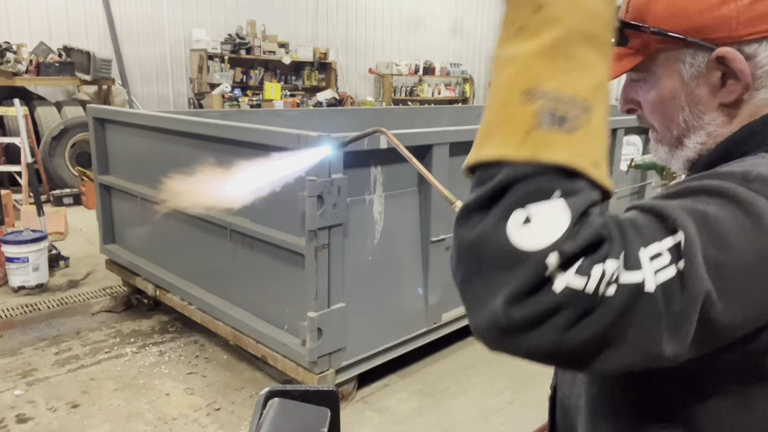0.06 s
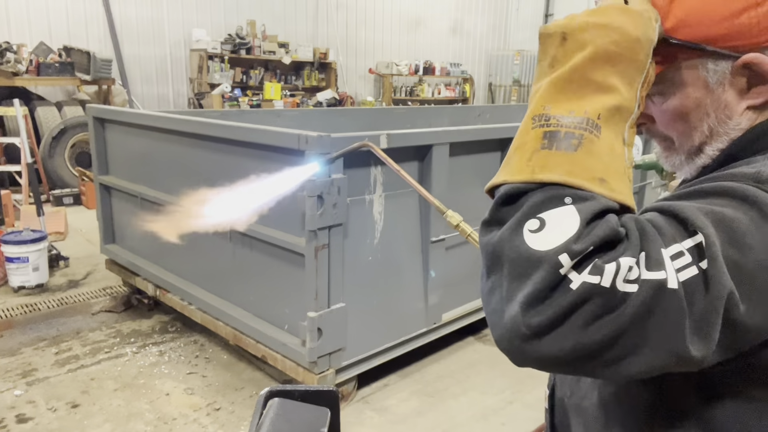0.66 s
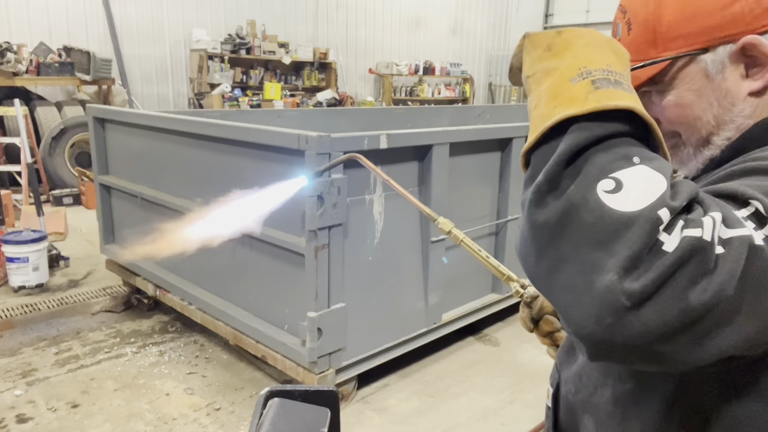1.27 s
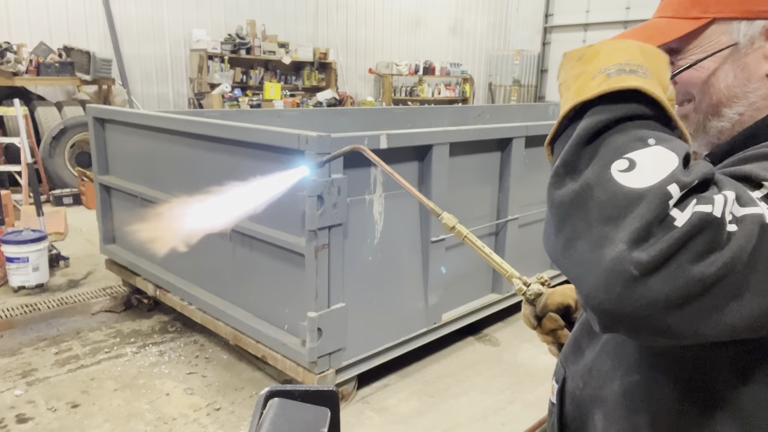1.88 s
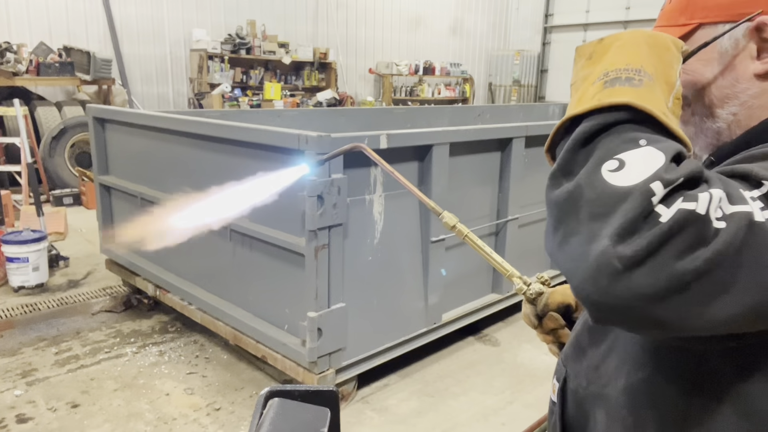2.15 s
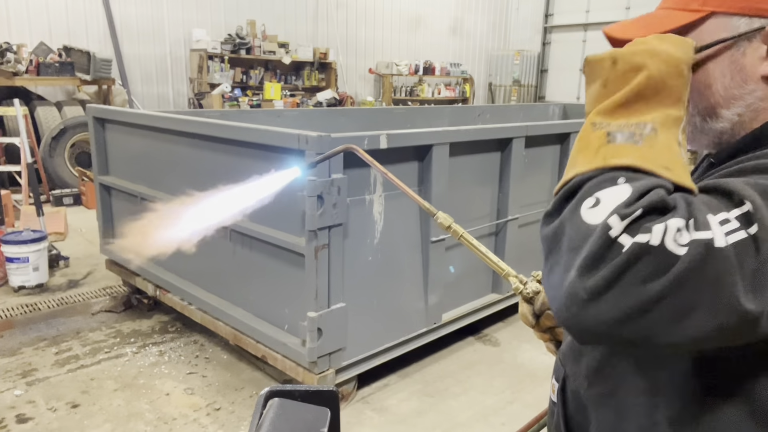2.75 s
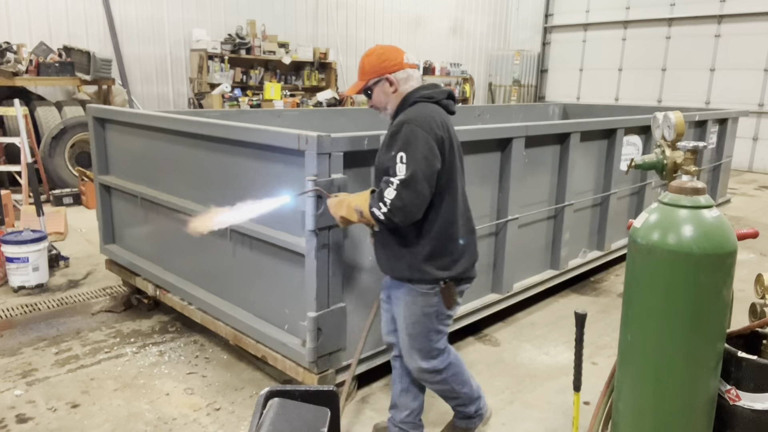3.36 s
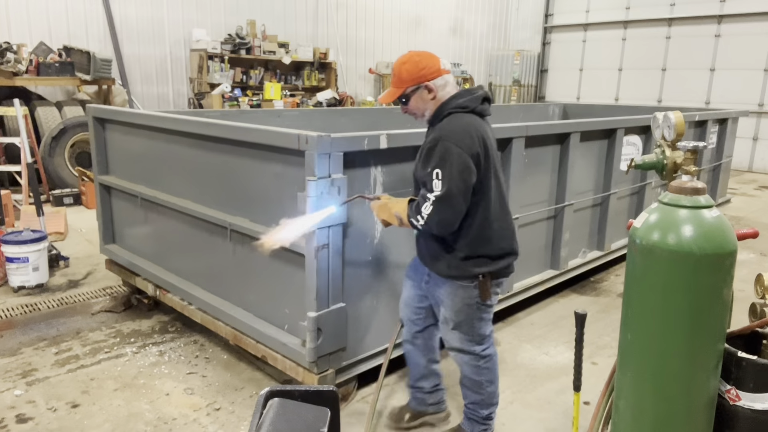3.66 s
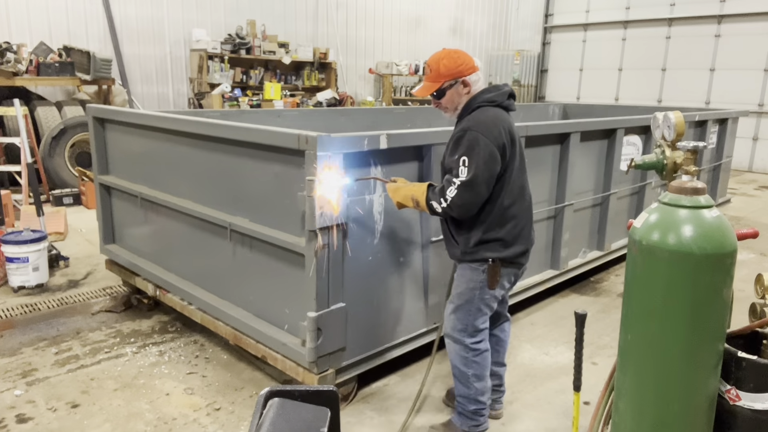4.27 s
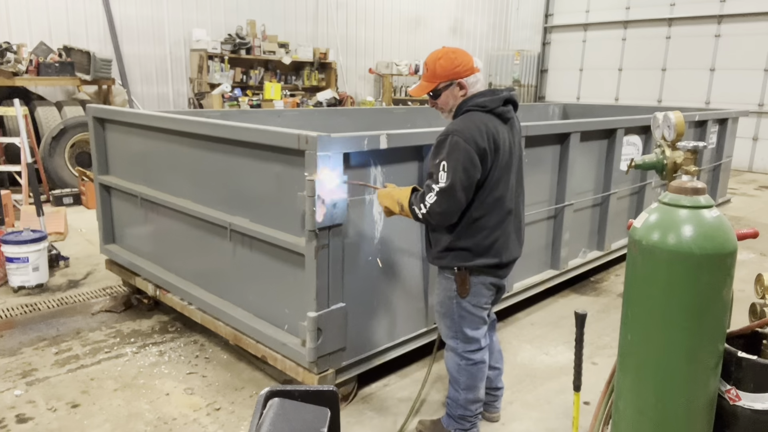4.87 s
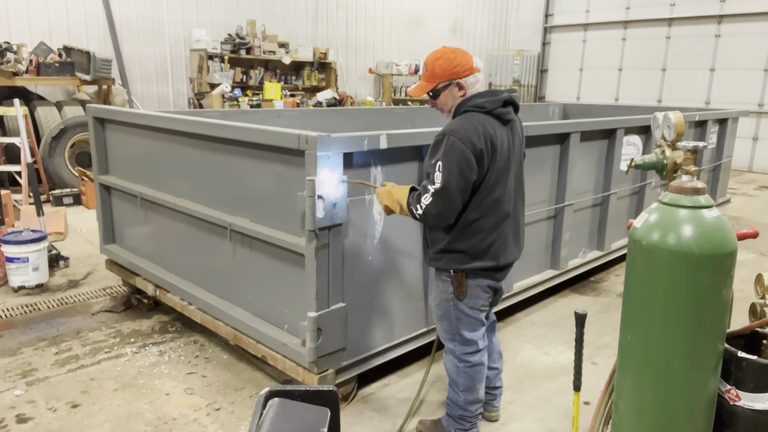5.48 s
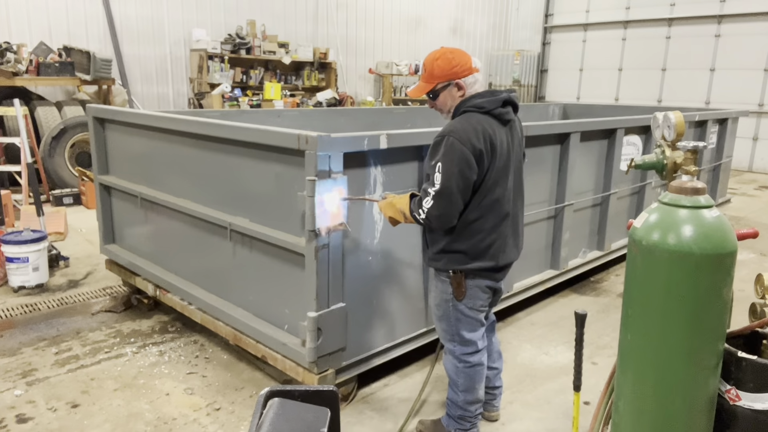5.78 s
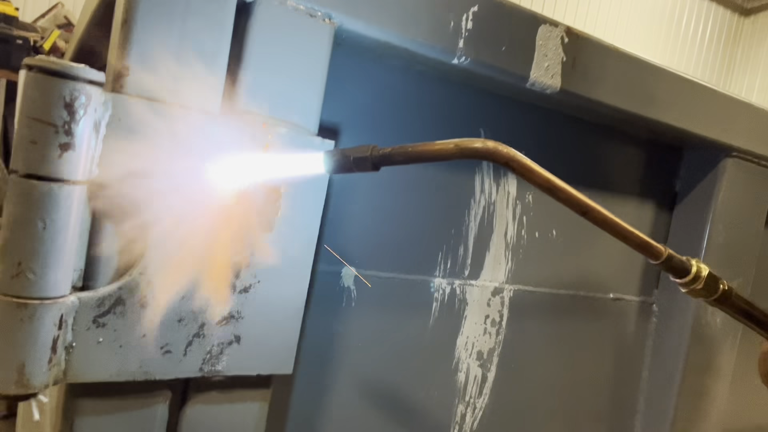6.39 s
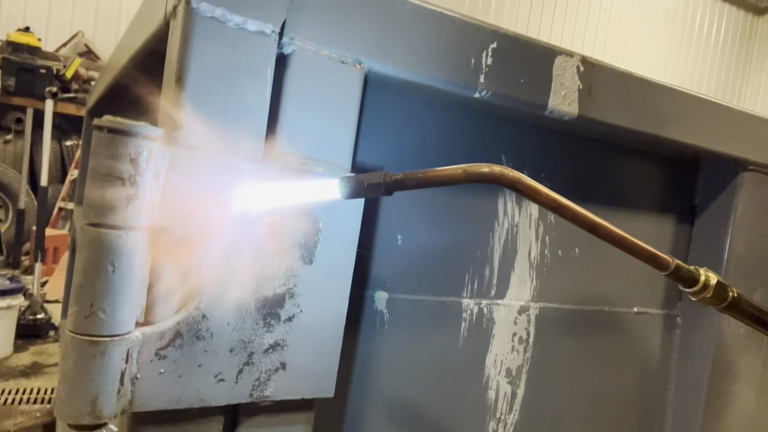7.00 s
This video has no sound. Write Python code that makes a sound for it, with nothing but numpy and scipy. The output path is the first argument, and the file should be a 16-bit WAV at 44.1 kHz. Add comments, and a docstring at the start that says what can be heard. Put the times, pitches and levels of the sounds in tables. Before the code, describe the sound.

A gas torch burns with a steady rushing roar and hiss in a workshop, then flutters and spits against a steel hinge.

```python
"""An oxy-acetylene torch burns over dull workshop room tone, heard first from beside the welder:
the turbulent flame roars and the gas jet hisses. At 3.1 s we cut to across the floor. From 4 s the
flame plays on a steel hinge: the roar swells, then softens, gas splashes and spits off the plate, and
the hiss flares whenever the jet catches an edge. At 5.9 s we cut right to the nozzle, where the hiss
keeps swishing with its echo off the steel as the nozzle moves."""
import sys
import numpy as np
from scipy import signal
from scipy.io import wavfile
from scipy.ndimage import uniform_filter1d

SR = 44100
rng = np.random.default_rng(int(sys.argv[2]) if len(sys.argv) > 2 else 0)


def generate_wav(sig):
    """Save sig (samples, or channels by samples) to the path in sys.argv[1] as 16-bit PCM at SR."""
    pcm = np.round(np.clip(np.atleast_2d(sig).T, -1, 1) * 32767).astype(np.int16)
    wavfile.write(sys.argv[1], SR, pcm)


N = 310464

BESIDE, FAR, CLOSE = range(3)  # listening places, in order
CUTS_S = (3.145, 5.941)
TOUCH_S, TOUCH_LENGTH_S = 3.96, 0.24  # the flame's tip reaches the steel

# room tone of the shop (frequency [Hz], level [dB])
ROOM_TONE = [(30, -89), (65, -69), (110, -73), (170, -89), (280, -65.5), (600, -74.5), (1500, -73.5),
             (4000, -81)]
# a low drone swells and ebbs (time [s], level [dB])
DRONE_LEVEL = [(4.4, -80), (4.9, -63), (5.5, -56), (5.9, -57), (6.1, -75)]
# ring of the shop and a steel bin (centre [Hz], width [Hz], lift beside [dB], far [dB], close [dB])
RESONANCES = [(121, 20, 2, 1, 2), (174, 49, 4.5, 2.0, 2.5), (264, 25, -1, 2, -1), (317, 40, 4.5, 3.5, 3.5),
              (381, 73, 4.5, 1, 5), (455, 42, -1, -2.5, -2.5), (522, 50, 5.5, 4, 3),
              (603, 56, -4, 2.5, 1.5), (707, 53, 0, -4, -0.5), (762, 63, -3, -0.5, 3),
              (835, 47, 0.5, 0, -2), (880, 55, 0, 0.5, 1.5), (932, 42, -2.5, -.5, 5.5),
              (975, 38, -0.5, -1, 3.5), (1310, 77, -3, -1, -0.5), (1570, 73, 1, 0.5, -1),
              (3120, 250, 1, 2, 4), (6500, 480, 0, 1.5, 1), (8100, 310, 1, 2, 1)]
# combustion roar (frequency [Hz], level beside [dB], far [dB], close [dB])
ROAR_SPECTRUM = [(25, -83, -93, -78), (55.6, -63.5, -78, -64), (100, -59.5, -65.5, -56),
                 (141, -53.5, -71.5, -51.5), (214, -57, -62.5, -51.5), (457, -59.5, -68.5, -56),
                 (887, -56.5, -65, -53.5), (1260, -61.5, -70, -54), (1640, -65, -73.5, -63.5),
                 (1940, -73, -81, -65.5), (2960, -73.5, -78, -62.5), (6000, -82, -83, -106)]
# one band of the roar swells or sinks (time [s], half length [s], lift [dB], centre [Hz])
ROAR_SWELLS = [(.47, .1, 3, 165), (1.75, .17, 3, 175), (3.7, 0.12, 5.5, 298), (3.98, 0.11, 2, 950),
               (4.4, .06, 3, 800), (4.8, 0.098, 3, 900), (4.83, 0.027, 8.3, 1600), (5.45, 0.091, 3, 900),
               (4.85, .25, -3, 680), (5.3, .35, -3, 500), (3, .25, 2, 740), (5.34, 0.034, 13, 1650),
               (5.47, 0.043, 8.9, 1650), (6.15, 0.11, 3, 170)]
# hiss at the nozzle (frequency [Hz], level beside [dB], far [dB], close [dB])
HISS_SPECTRUM = [(2060, -68.5, -78, -94), (3600, -75.3, -80, -68), (4470, -67.3, -73.5, -66.5),
                 (5300, -65.3, -70, -65.3), (6500, -60.5, -67, -66), (7300, -65, -69.5, -67),
                 (7700, -61.5, -67, -61), (11800, -60.5, -66.5, -63), (13000, -63.5, -68, -64.5),
                 (14700, -63, -69, -63.5), (15700, -62.5, -66.5, -63)]
# the hiss between flares (time [s], level [dB])
HISS_LEVEL = [(0, 0.1), (3.2, 0.5), (3.65, 1), (3.9, -.5), (4.08, -4), (4.5, -4), (5.3, -3.5), (5.9, -2.5),
              (5.97, 1), (6.5, 0.5), (6.62, -1), (6.78, 0), (7.04, -1)]
# the top of the hiss dips (time [s], half length [s], gain [dB])
HISS_LULLS = [(4.15, .06, -1), (4.46, .012, -2), (4.85, .009, -2.5), (4.94, .02, -3), (5.15, .01, -2),
              (5.44, .01, -5), (5.6, .025, -2), (5.79, .015, -2), (6.62, .014, -2.5), (6.7, .01, -2.5),
              (6.77, .012, -1), (6.885, .014, -4.5), (7.02, .025, -2)]
# the jet catches an edge
# (time [s], half length [s], strength [dB], centre [Hz], half width [octaves], glide [octaves/s])
EDGE_FLARES = [(3.96, .02, 2, 11000, 0.5, 0), (4.255, .016, -2, 7000, .55, 0),
               (4.305, .018, 2, 11500, .25, 13), (4.335, .014, 3, 4800, .3, 0),
               (4.372, .018, 6, 9000, 0.64, 0), (4.41, .012, 3.5, 14000, .3, -8),
               (4.428, .011, 6.5, 9700, 0.14, -8), (4.48, 0.015, -1, 6800, .4, 0),
               (4.54, 0.033, 4, 8200, .33, -1.5), (4.575, .008, 2, 14000, .5, 0),
               (4.63, .02, -3.5, 12000, .5, 0), (4.686, 0.016, 2.5, 13000, .5, 0),
               (4.76, .03, 1, 13000, 0.48, 0), (4.822, .008, 0, 13000, 0.51, 0),
               (4.877, 0.01, 1, 8000, .6, 0), (4.98, .009, 0, 14500, 0.23, 0),
               (5.045, .014, 4.5, 14500, 0.3, 0), (5.065, .03, -3, 4200, .4, -2),
               (5.095, 0.027, 3, 10500, .45, -7), (5.125, .009, 2, 15300, .15, 0),
               (5.185, 0.022, 3.5, 12500, 0.28, -10), (5.403, 0.014, 0, 8500, 0.47, 0),
               (5.44, .015, -3, 8000, 0.27, 0), (5.49, .014, -2.5, 11000, .8, 0),
               (5.68, 0.02, 0, 6000, .8, 0), (5.715, .016, 0, 12000, .6, 0),
               (5.83, 0.019, -8, 15000, .3, 0), (5.905, 0.031, 2.5, 12000, 0.83, 0),
               (5.997, .014, 2, 11200, .13, 0), (6.002, .018, -2, 6500, .1, 0),
               (6.228, .012, 4, 13240, .09, 5), (6.325, .014, 3, 8200, .06, 2),
               (6.385, 0.022, 4.5, 9800, 0.08, 5), (6.465, .01, 2, 10300, .06, 3),
               (6.545, 0.028, 5.5, 11200, 0.17, 6), (6.657, .01, 4.5, 11500, .18, 0),
               (6.677, 0.0093, 1, 8100, .08, 0), (6.728, .01, 3.5, 10000, 0.28, 0),
               (6.839, .013, 9, 14300, 0.18, 0), (6.922, .01, 3, 10500, .3, -8),
               (6.977, 0.037, 3, 8000, 0.41, -1)]
# band cancelled by the echo off the steel; a negative depth lifts it (time [s], centre [Hz], depth [dB])
PLATE_NOTCH = [(3.9, 3600, -6), (4.02, 4400, 8), (4.09, 6000, 6), (4.2, 7300, -1.5), (5.13, 7000, -1),
               (5.22, 5000, 5), (5.32, 3300, 0), (5.97, 5300, 3), (6.18, 6600, 3), (6.31, 7000, 12),
               (6.4, 7700, 8), (6.47, 8950, 8), (6.54, 8800, 2), (6.58, 5000, 0), (6.62, 5000, 3),
               (6.7, 6000, 3), (6.78, 6400, 3.5), (6.84, 7500, 9), (6.88, 8800, 5), (6.92, 10000, -1.5)]
# stereo image at each place (frequency [Hz], likeness [0-1], left lead [rad], left over right [dB])
IMAGE_BESIDE = [(100, .99, 0, -.8), (180, .97, .1, -1), (300, .95, .3, .2), (500, .72, .8, 1),
                (850, .8, .8, 3.3), (1100, .85, .5, 2), (1650, .8, 1.1, 0), (2000, .75, 2, -.6),
                (2700, .78, 2.85, 0), (3100, .96, 3.08, 0), (3300, .99, 3.14, 0), (3500, .96, 3.22, 0),
                (3800, .78, 3.55, 0), (4300, .65, 4.2, .7), (4700, .72, 4, 3), (5400, .72, 4.05, 2.8),
                (6200, .79, 4.45, -1.8), (7000, .62, 4.75, -4.6), (8000, .8, 4.45, -1.6),
                (9500, .78, 4.6, 0), (15500, .77, 4.8, 0)]
IMAGE_FAR = [(100, .96, 0, -1.5), (300, .9, .2, -.5), (500, .64, .65, 0), (1000, .78, .5, 1.6),
             (1750, .68, .55, -.3), (2200, .6, 1.5, 0), (3300, .68, 2.2, 0), (3700, .88, 3.05, 0),
             (4100, .95, 3.14, 0), (4900, .93, 3.2, .8), (5400, .78, 3.25, 1.8), (5800, .82, 3.45, 0),
             (6400, .75, 3.9, -4), (7000, .61, 4.45, -6), (8000, .83, 4.5, -1.6), (9500, .82, 4.65, 0),
             (15500, .77, 4.8, 0)]
IMAGE_CLOSE = [(120, .995, 0, -.5), (250, .98, .3, -3.5), (480, .87, .4, 3), (630, .96, .8, -2.5),
               (900, .97, .9, .5), (1400, .92, 1.6, .3), (1650, .84, 2.3, 0), (1850, .96, 3.06, .3),
               (2050, .96, 3.2, 0), (2750, .52, 4.3, 0), (3100, .64, 4.45, 0), (3600, .42, 4.1, 0),
               (4200, .46, 4.9, 0), (4700, .68, 6, 1), (5100, .5, 6.3, 5), (5500, .2, 5.3, 7),
               (6300, .6, 4.3, 2), (6900, .55, 4.25, -2), (8000, .83, 4.3, -1.7), (9500, .78, 4.65, 0),
               (15500, .79, 4.8, 0)]
# a hollow, out-of-phase band glides with the torch's bearing (time [s], shift at 3 kHz [octaves])
BEARING_GLIDE = [(.3, .2), (1.4, 0), (3.14, -.02), (3.2, -.46), (3.5, -.2), (3.95, .15), (4.4, .02),
                 (5.9, 0), (6.05, .3), (6.3, 0), (6.9, 0), (7.04, .15)]


def amp(db):
    """Decibels to gain."""
    return 10 ** (np.asarray(db) / 20)


def over_time(rows, t):
    """A table's columns as straight-line envelopes."""
    s, *columns = np.transpose(rows)
    return [np.interp(t, s, c) for c in columns]


def over_pitch(rows, hz):
    """A table's columns as curves on a log-frequency axis."""
    f, *columns = np.transpose(rows)
    return [np.interp(np.log(hz + 1), np.log(f + 1), c) for c in columns]


def bell(x, centre, half_width):
    """A Gaussian hump of height 1."""
    return np.exp(-.5 * ((x - centre) / half_width) ** 2)


def band(hz, centre_hz, octaves, shift=0):
    """A bell-shaped EQ band, with half width and shift in octaves."""
    return bell(np.log2((hz + 1) / centre_hz), shift, octaves)


def step(t, at_s, length_s):
    """A smooth rise from 0 to 1."""
    return .5 + .5 * np.tanh((t - at_s) / length_s)


def grid(size):
    """Frame times (a column) and bin frequencies (a row) of short-time spectra."""
    hop = size // 4
    return np.arange(N // hop + 2)[:, None] * hop / SR, np.fft.rfftfreq(size, 1 / SR)


def place_at(t):
    """The listening place of each frame."""
    return np.searchsorted(CUTS_S, t[:, 0])


def eddies(t, hz, life_s, span_hz):
    """Random modulation of unit spread, in patches that last life_s and cover span_hz."""
    field = rng.standard_normal((len(t), len(hz)))
    field = uniform_filter1d(field, max(1, round(life_s / t[1, 0])), axis=0, mode="wrap")
    field = uniform_filter1d(field, max(1, round(span_hz / hz[1])), axis=1, mode="wrap")
    return field / field.std()


def stereo_image(t, hz):
    """Likeness, phase lead and balance of left and right, following the place and the torch's bearing."""
    place = place_at(t)
    shifted_hz = hz / 2 ** (over_time(BEARING_GLIDE, t)[0] * band(hz, 3000, octaves=1.2))
    likeness, lead, balance_db = np.zeros((3, len(t), len(hz)))
    for where, image in enumerate((IMAGE_BESIDE, IMAGE_FAR, IMAGE_CLOSE)):
        here = place == where
        likeness[here], lead[here], _ = over_pitch(image, shifted_hz[here])
        balance_db[here] = over_pitch(image, hz)[2]
    # the jet scatters as it first meets the hinge, and its sound turns diffuse
    scatter = 0.9 * bell(t, 4.11, .06) * band(hz, 4700, octaves=.5)
    return np.clip(likeness * (1 - scatter), 0, 1), lead, amp(balance_db)


def stereo_noise(density, t, hz):
    """Noise shaped to a density (frames x bins, per root Hz) and spread across the stereo image."""
    size = 2 * (len(hz) - 1)
    frame = dict(nperseg=size, noverlap=size * 3 // 4)
    white = rng.standard_normal((2, N + size))
    shared, apart = signal.stft(white, **frame)[2].swapaxes(1, 2)[:, :len(t)]
    likeness, lead, balance = stereo_image(t, hz)
    left = shared * balance
    right = (likeness * shared + np.sqrt(1 - likeness ** 2) * apart) * np.exp(-1j * lead)
    gain = density * np.sqrt(SR / (1 + balance ** 2))
    return signal.istft((np.array([left, right]) * gain).swapaxes(1, 2), **frame)[1][:, :N]


def room_tone(drone_hz=65, width_hz=2.5, rolloff_hz=5000):
    """The dull bed of the shop, with a faint low drone."""
    t, hz = grid(size=16384)
    bed = amp(over_pitch(ROOM_TONE, hz)[0]) * bell(hz, 0, rolloff_hz)
    drone = amp(over_time(DRONE_LEVEL, t)[0]) * bell(hz, drone_hz, width_hz)
    return stereo_noise(np.hypot(bed, drone), t, hz)


def resonance_db(hz):
    """The shop and the steel bin ring and colour the torch (places x bins)."""
    return sum(np.outer(lift_db, 1 / (1 + (2 * (hz - centre) / width) ** 2))
               for centre, width, *lift_db in RESONANCES)


def wall_echoes(t, hz, ripple_db=1.2):
    """Echoes off the bin's wall ripple the treble, shifting slowly with the hand."""
    return amp(ripple_db * eddies(t, hz, life_s=0.251, span_hz=170))


def plate_echo(t, hz, far_octaves=0.29, close_octaves=0.09):
    """The echo off the steel combs the hiss into a swish that sweeps as the nozzle moves."""
    notch_hz, depth_db = over_time(PLATE_NOTCH, t)
    width = np.where(place_at(t) == CLOSE, close_octaves, far_octaves)[:, None]
    notch = band(hz, notch_hz, width)
    crest = 0.14 * band(hz, notch_hz, width, shift=.28)
    second_notch = 0.2 * band(hz, notch_hz, width, shift=.86)
    return amp(depth_db * (crest - notch - second_notch))


def splash(t, hz, surge, far_db=-79, close_db=-71, flare_db=3.5, sizzle_db=3):
    """Gas splashes off the plate: from afar a sizzle that surges with each flare, close up a rush."""
    sizzle = amp(sizzle_db * eddies(t, hz, life_s=.009, span_hz=2500))
    swell = np.sqrt(1 + amp(flare_db) ** 2 * surge)
    far = amp(far_db) * bell(hz, 4400, 1200) * swell * sizzle
    close = amp(close_db) * bell(hz, 3700, 1100)
    return np.where((place_at(t) == CLOSE)[:, None], close, far)


def spits_db(t, hz, per_s=22, most_db=4, lowest_hz=5000, highest_hz=15000, half_length_s=.004):
    """Gas spits off the hot steel at random, each spit flicking up one treble band."""
    contact_s = N / SR - TOUCH_S
    lift_db = np.zeros((len(t), len(hz)))
    for when, pitch, size in rng.random((round(per_s * contact_s), 3)):
        envelope = bell(t, TOUCH_S + when * contact_s, half_length_s)
        centre_hz = lowest_hz * (highest_hz / lowest_hz) ** pitch
        lift_db += most_db * size * envelope * band(hz, centre_hz, octaves=.35)
    return lift_db


def lulls_db(t, hz, centre_hz=13500):
    """The top of the hiss ducks briefly between flares."""
    duck_db = sum(dip_db * bell(t, s, length) for s, length, dip_db in HISS_LULLS)
    return duck_db * band(hz, centre_hz, octaves=0.27)


def edge_flares(t, hz):
    """The jet catches edges and bands flare up: their power per bin, and their joint surge in time."""
    bands, surge = np.zeros((len(t), len(hz))), np.zeros_like(t)
    for s, length, flare_db, centre_hz, octaves, glide in EDGE_FLARES:
        near = abs(t[:, 0] - s) < 4 * length
        power = amp(flare_db) ** 2 * bell(t[near], s, length)
        bands[near] += power * band(hz, centre_hz, octaves, shift=glide * (t[near] - s))
        surge[near] += power
    return bands, surge


def jet_hiss(flutter_db=1.1, free_flutter=.7, spurt_db=1, sputter_db=0.8, spurt_hz=9000, low_hz=1500):
    """The gas jet hisses; on the steel it flutters harder, and its treble spurts and sputters."""
    t, hz = grid(size=512)
    on_plate = step(t, TOUCH_S, TOUCH_LENGTH_S)
    colour = amp(over_pitch(HISS_SPECTRUM, hz) + resonance_db(hz))[place_at(t)]
    flares, surge = edge_flares(t, hz)
    level = np.sqrt(amp(over_time(HISS_LEVEL, t)[0]) ** 2 + flares)
    no_bass = hz ** 2 / np.hypot(hz ** 2, low_hz ** 2)  # so thin a jet radiates only treble
    unrest_db = spurt_db * eddies(t, hz, life_s=.029, span_hz=2000)
    unrest_db += sputter_db * eddies(t, hz, life_s=.012, span_hz=9000)
    treble = hz / np.hypot(hz, spurt_hz)
    texture = amp(unrest_db * on_plate * treble + spits_db(t, hz) + lulls_db(t, hz))
    hiss = colour * level * no_bass * texture
    depth_db = flutter_db * (free_flutter + (1 - free_flutter) * on_plate)
    flutter = amp(depth_db * eddies(t, hz, life_s=.018, span_hz=1200))
    gas = np.hypot(hiss, on_plate * splash(t, hz, surge)) * flutter
    return stereo_noise(gas * plate_echo(t, hz) * wall_echoes(t, hz), t, hz)


def flame_roar(touch_db=3, flatten_db=-3.5, standing_db=2.5, smooth_below_hz=500):
    """Burning eddies expand and rumble, louder on touching the steel, softer once pressed flat on it."""
    t, hz = grid(size=4096)
    colour_db = (over_pitch(ROAR_SPECTRUM, hz) + resonance_db(hz))[place_at(t)]
    ride_db = touch_db * bell(t, TOUCH_S, TOUCH_LENGTH_S) + flatten_db * step(t, at_s=4.44, length_s=.1)
    for s, length, swell_db, centre_hz in ROAR_SWELLS:
        ride_db = ride_db + swell_db * bell(t, s, length) * band(hz, centre_hz, octaves=0.18)
    # fine standing waves drift as the torch moves
    standing = eddies(t, hz, life_s=.5, span_hz=22) * hz / np.hypot(hz, smooth_below_hz)
    return stereo_noise(amp(colour_db + ride_db + standing_db * standing), t, hz)


def scene(fade_s=0.035, fade_curve=0.98):
    """The torch over the room tone, with a quick fade out and in at each cut."""
    t = np.arange(N)[:, None] / SR
    from_cut_s = abs(t - CUTS_S).min(axis=1)
    fade = np.minimum(from_cut_s / fade_s, 1) ** fade_curve
    return fade * (flame_roar() + jet_hiss() + room_tone())


def record(dry, low_cut_hz=36, high_cut_hz=15870):
    """A low cut trims the rumble and a steep high cut takes off the very top."""
    low_cut = signal.butter(N=4, Wn=low_cut_hz, btype="high", fs=SR, output="sos")
    high_cut = signal.firwin(1023, high_cut_hz, window=("kaiser", 9), fs=SR)
    return signal.oaconvolve(signal.sosfilt(low_cut, dry), high_cut[None], "same", axes=1)


dry = scene()
out = record(dry)
generate_wav(out)
```